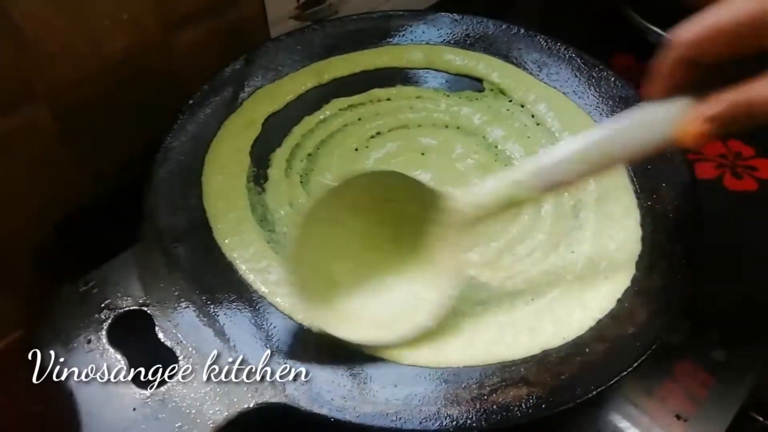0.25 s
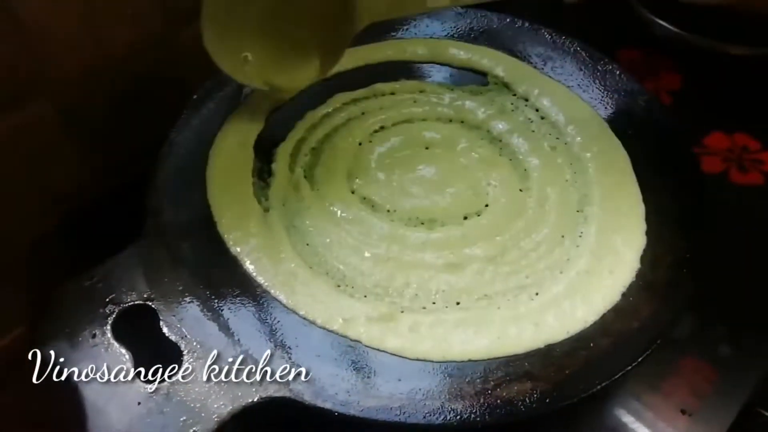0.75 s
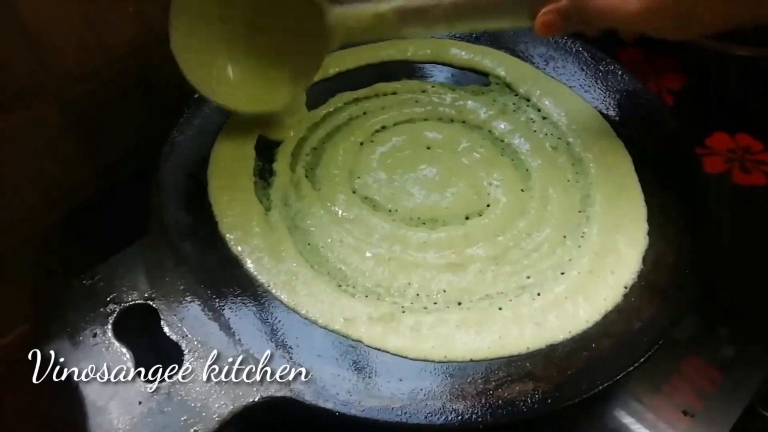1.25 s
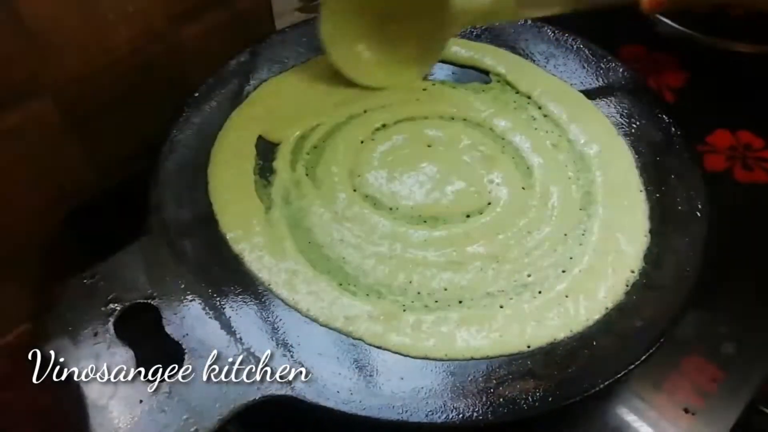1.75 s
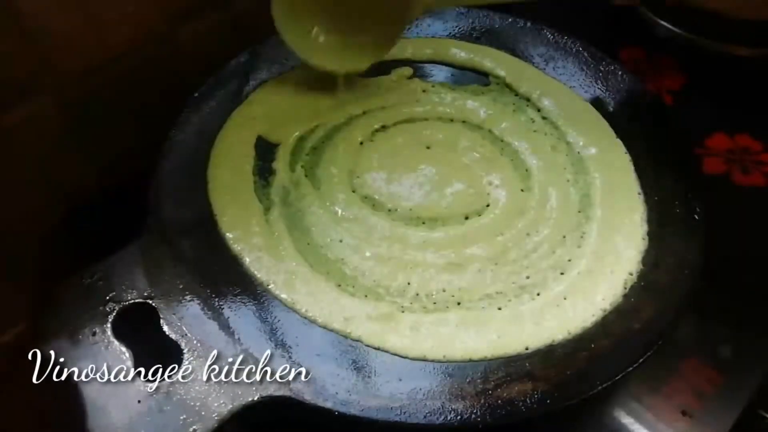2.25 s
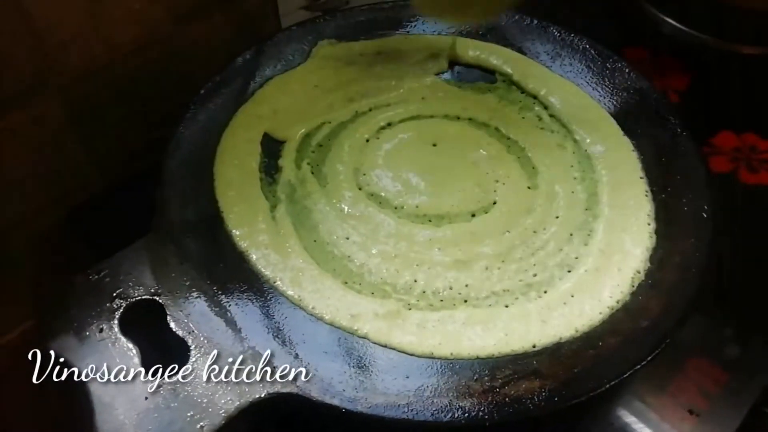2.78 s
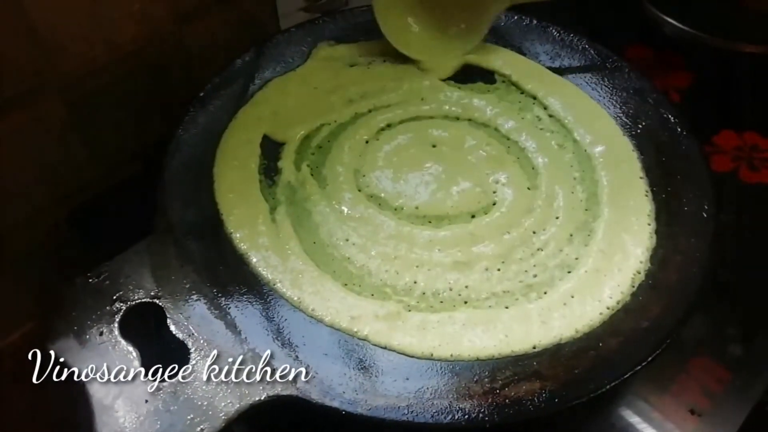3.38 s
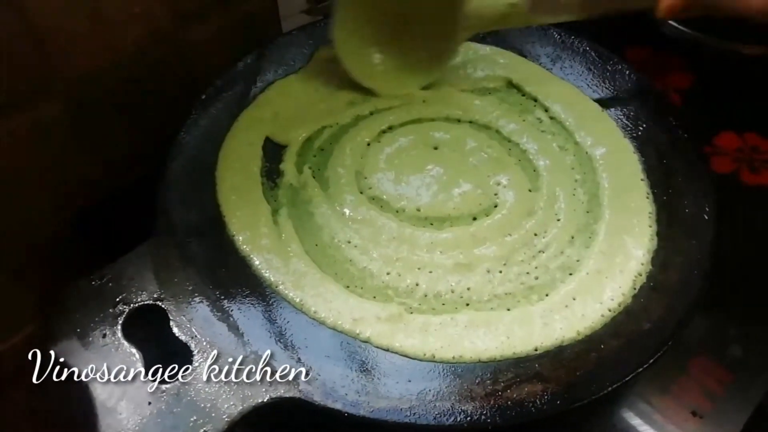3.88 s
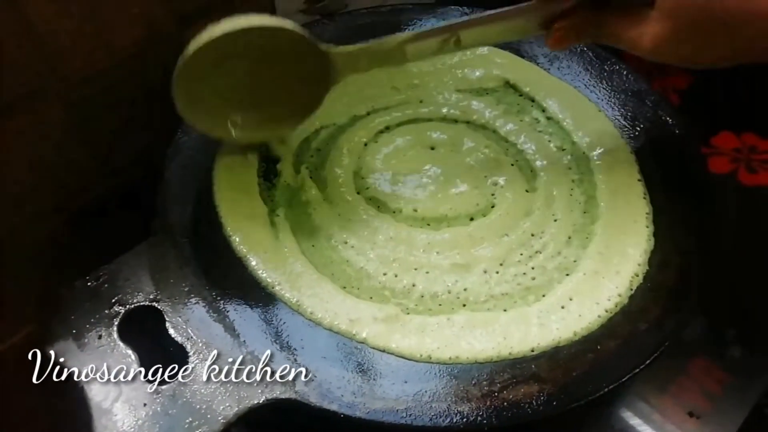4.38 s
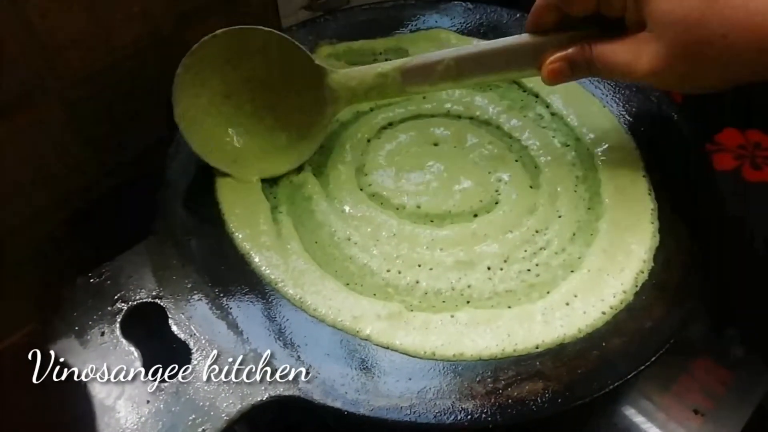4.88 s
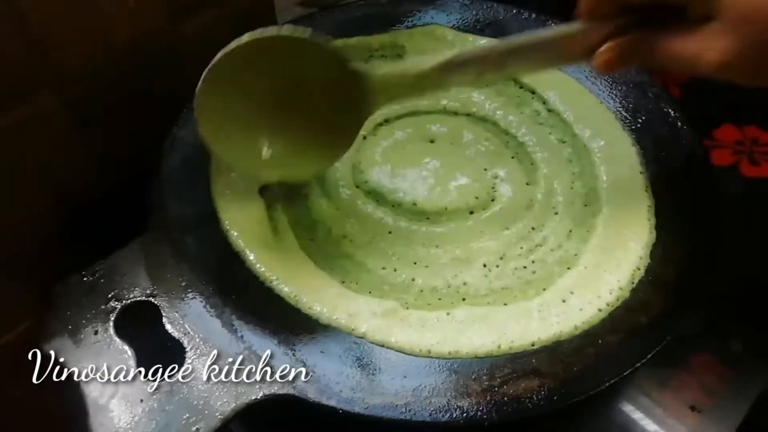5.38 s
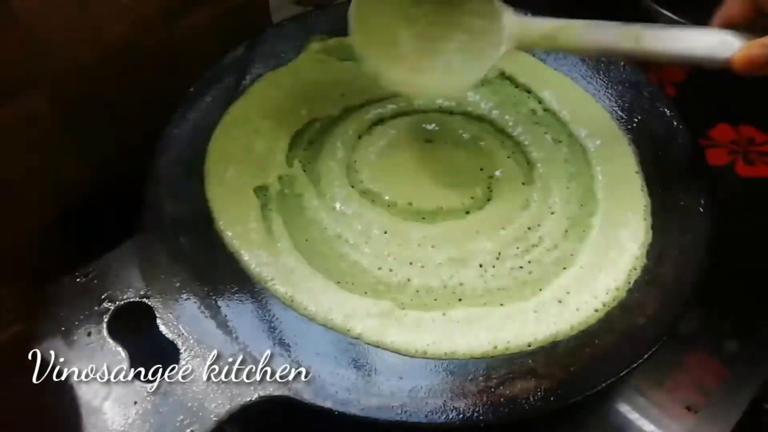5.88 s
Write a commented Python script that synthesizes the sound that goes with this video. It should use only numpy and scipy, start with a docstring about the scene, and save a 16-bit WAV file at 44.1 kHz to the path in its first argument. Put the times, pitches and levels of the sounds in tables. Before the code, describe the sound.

Wet batter sizzles and crackles sharply on a hot griddle, with bursts of pressed-out steam, the frying thinning to sparse pops over six seconds.

```python
"""Batter frying on a hot griddle

Batter fries on a hot iron griddle in a home kitchen, heard close by through two unlike microphone ports.
Clumped random clicks make the crackle of tiny steam bubbles; resonators ring as bubbles under the batter.
Larger bubbles pop as a snap with decaying noise; steam, pressed out by the ladle, is noise in narrow bands,
and gaps whistle faintly. Under it lie room noise, hum tones, a swelling rumble and two dull bumps."""
import sys
import numpy as np
from scipy import signal
from scipy.fft import rfft, irfft
from scipy.io import wavfile
from scipy.ndimage import map_coordinates

SR = 44100
rng = np.random.default_rng(int(sys.argv[2]) if len(sys.argv) > 2 else 0)


def int16_out(signal):
    """Quantize to a 16-bit WAV file."""
    q = np.round(np.clip(np.atleast_2d(signal).T, -1, 1) * 32767)
    wavfile.write(sys.argv[1], SR, q.astype(np.int16))


N = 270333


def amp(db):
    """Amplitude ratio of a level in dB, by the decibel law."""
    return 10 ** (np.asarray(db) / 20)


def rms_one(x):
    """Normalisation of mean power: the signal scaled to rms 1."""
    return x / np.sqrt(np.mean(x ** 2) + 1e-20)


def in_time(rows):
    """Linear interpolation of each column of a curve, sample by sample."""
    times_s, *columns = np.transpose(rows)
    return [np.interp(np.arange(N) / SR, times_s, column) for column in columns]


def drift(rate):
    """Band-limited fluctuation: a smooth curve through normal random knots, rate of them a second."""
    knots = rng.standard_normal(1000)
    return map_coordinates(knots, [np.arange(N) / SR * np.clip(rate, .1, 150)], order=3)


def filtered(x, order, edges_hz, kind):
    """Butterworth filtering: a maximally flat pass band."""
    return signal.sosfilt(signal.butter(order, edges_hz, kind, fs=SR, output="sos"), x)


def colour(x, points):
    """Minimum-phase filtering: folding the cepstrum gives the causal response of a spectrum (f/Hz, level/dB)."""
    hz, db = np.transpose(points)
    grid = np.fft.rfftfreq(4096, 1 / SR) + 1
    log_gain = np.interp(np.log(grid), np.log(hz), db) * np.log(10) / 20
    cepstrum = irfft(log_gain)
    cepstrum[1:2048] *= 2
    cepstrum[2049:] = 0
    response = irfft(np.exp(rfft(cepstrum)))
    return signal.oaconvolve(x, response)[:N]


def resonance(x, hz, width_hz):
    """Damped resonance: a pole pair whose radius sets the bandwidth, with about unit gain at its peak."""
    r = np.exp(-np.pi * width_hz / SR)
    zeros = np.array([1, 0, -1]) * (1 - r * r) / 2
    poles = [1, -2 * r * np.cos(2 * np.pi * hz / SR), r * r]
    return signal.lfilter(zeros, poles, x)


def bursts(per_s, spread_db, clump_db):
    """Clustered random process: clicks of fluctuating rate; most are small, a few larger when spread_db > 0."""
    crowding = .15 * drift(9) + .8 * drift(40) + .7 * drift(110)
    rate = per_s / SR * amp(clump_db * np.clip(crowding, -2, 1.6))
    born = rng.random(N) < rate
    size = amp(spread_db * np.minimum(rng.exponential(1, N), 4.0))
    return born * size * rng.choice([-1, 1], N) + 1e-18


def spots(clicks, lean_s, lag_s, echo_db, echo_t60, count=10):
    """Path difference: clicks are dealt to places, each with its own port delays and near echoes."""
    out, dealt = np.zeros((2, N)), rng.integers(0, count, N)
    t = np.arange(700) / SR
    for k in range(count):
        offset_s = lean_s + lag_s * rng.uniform(-1.15, 1)   # half the delay of left behind right
        echoes = amp(echo_db - 60 * t / echo_t60) * rng.standard_normal((2, len(t)))
        direct = np.sinc((t - .0004 - offset_s * np.array([[1], [-1]])) * SR)
        out += signal.oaconvolve((clicks * (dealt == k))[None], echoes + direct, axes=1)[:, :N]
    return out


def ports(x):
    """Frequency response of the two ports: each colours the griddle differently, after a bass cut."""
    # response of each port to sound from the griddle: f/Hz, level/dB
    left_response = [(300, -19), (600, -17), (1000, -9.5), (1800, -4.5), (2450, -7.5), (2800, -1.5),
                     (3700, 2), (4600, 9.5), (5100, 7.5), (6300, 13), (7700, -1.5), (9800, -14),
                     (10900, -7), (12500, -23.5), (14800, -4.5), (15600, -65)]
    right_response = [(300, -31), (600, -13.5), (1000, -9), (1900, -7.5), (2500, 3), (2950, 9.5),
                      (3400, 5.5), (4000, 4), (6000, 5.5), (7500, 3.5), (8200, 5.5), (9200, 0),
                      (10000, 3.5), (11000, -2), (14900, -0.5), (15600, 6.5)]
    x = filtered(x, 2, 550, "high")   # no bass comes from the batter
    return np.array([colour(x[0], left_response), colour(x[1], right_response)])


def crackle(level_db):
    """Superposition of impulses: countless tiny bursts merge into a hiss, with sharper single ticks above it."""
    fine = bursts(12000, spread_db=0.5, clump_db=3.0)
    fine = spots(fine, lean_s=.00003, lag_s=0.000041, echo_db=-21.0, echo_t60=0.033)
    ticks = bursts(1100, spread_db=4.5, clump_db=6.5)
    ticks = spots(ticks, lean_s=.00003, lag_s=0.00017, echo_db=-10.0, echo_t60=0.011)
    fine = signal.lfilter([1, -.15], [1], fine)   # the smallest bubbles are the brightest
    return amp(level_db) * rms_one(ports(rms_one(fine) + amp(-1.0) * rms_one(ticks)))


def bubbling(swing_db):
    """Bubble resonance: size sets the pitch of bubbles ringing under the wet batter; they fade with the frying."""
    # bubbles of one size crowd in: t/s, half length/s, f/Hz, added share (ratio)
    gurgles = [(3.274, 0.16, 1560, 4.4), (3.805, 0.13, 1060, 3.4), (4.63, 0.061, 1550, 1.2)]
    gurgle_spread = 0.18   # of log pitch
    prevailing_hz, mean_db, follows, waver_db = 1550, -47.5, 0.91, -0.5   # follows: share of the frying's swing
    t = np.arange(N) / SR
    clicks = bursts(1200, spread_db=1.5, clump_db=4.0)
    dealt, rings = rng.integers(0, 14, N), 0
    for k, hz in enumerate(np.geomspace(750, 2300, 14)):
        share = 1.86 + np.exp(-.5 * (np.log(hz / prevailing_hz) / 0.06) ** 2)
        for s, half, at_hz, more in gurgles:
            off_pitch = np.log(hz / at_hz) / gurgle_spread
            share = share + more * np.exp(-((t - s) / half) ** 2 - off_pitch ** 2)
        rings = rings + resonance(clicks * share * (dealt == k), hz, 0.035 * hz)
    level_db = mean_db + follows * swing_db + waver_db * drift(8.7)
    placed = spots(rings, lean_s=0, lag_s=.00003, echo_db=-75, echo_t60=0.07, count=1)
    return amp(level_db) * rms_one(ports(placed))


def steam():
    """Jet noise: puffs through many small gaps excite bands near a centre pitch and over an octave below it.

    The ports hear the puffs in unrelated phase."""
    # steam squeezed out from under the batter: t/s, level/dB (rms), centre f/Hz
    jets = [(0.0, -34, 6300), (0.5, -38, 6400), (0.54, -23, 5440), (0.585, -22.5, 5200),
            (0.615, -23.5, 5200), (0.65, -25, 5140), (0.68, -24.5, 5000), (0.76, -29, 5100),
            (0.9, -31, 5400), (1.0, -35, 5170), (1.3, -28, 5700), (1.42, -37.5, 6300), (2.0, -38, 5250),
            (2.18, -35.5, 5200), (2.44, -27.5, 5700), (2.61, -31.5, 5300), (2.77, -66, 5530),
            (2.83, -32, 6500), (2.95, -91, 5650), (3.08, -45, 5750), (3.24, -42, 5740), (3.38, -40, 4600),
            (3.43, -31.5, 5150), (3.68, -24.5, 5400), (3.89, -30.5, 5080), (3.96, -26.5, 5560),
            (4.26, -30, 5480), (4.35, -28.5, 4930), (4.44, -25.5, 5150), (4.58, -31.5, 5460),
            (4.72, -30.5, 5200), (4.79, -30, 5730), (4.99, -32, 5950), (5.12, -40.5, 5750),
            (5.36, -63, 5900), (6.13, -70, 5800)]
    strong_jet_db, under_at_strong_db, under_gain_per_db = -26.5, -14, 0.68
    level_db, centre_hz = in_time(jets)
    # the weaker the jet, the larger the share of its lower band
    under_db = np.minimum(under_at_strong_db + under_gain_per_db * (strong_jet_db - level_db), -4.0)
    puffs = bursts(9000, spread_db=0.0, clump_db=1.5) * rng.choice([-1, 1], (2, N))
    dealt, main, under = rng.integers(0, 14, N), 0, 0
    for k, hz in enumerate(np.geomspace(4450, 6700, 14)):
        nearness = np.exp(-.5 * (np.log(hz / centre_hz) / 0.094) ** 2)
        gap = puffs * (dealt == k) * (0.28 + nearness)
        gap = gap * amp(1.9 * drift(18))   # each gap opens and closes on its own
        main = main + resonance(resonance(gap, hz, 450), hz, 940)
        under = under + resonance(gap, 0.444 * hz, 480)
    right_stronger = amp([[0], [1.5]])
    return amp(level_db) * rms_one(ports((main + amp(under_db) * under) * right_stronger))


def kitchen():
    """Interchannel coherence: room noise is more alike at both ports in the bass; hum and rumble are identical."""
    # room noise spectrum, normalised below: f/Hz, relative level/dB
    room_spectrum = [(29, -32.5), (50, 0.5), (92, -1), (150, -6), (238, -7), (292, -10.5), (522, -17.5),
                     (582, -18.5), (900, -18.5), (1170, -38), (1980, -120)]
    # wavering hum tones: f/Hz, width of each of two resonances/Hz, level/dB (rms)
    hum_tones = [(61.2, 18, -66), (100.8, 5.8, -60.5), (198, 10, -65), (594, 7.8, -78), (650, 23, -76.5)]
    # swells added to the steady rumble: t/s, top level/dB (rms), half length/s
    rumble_swells = [(0.233, -52, 0.07), (0.66, -64, .1), (1.55, -67, .2), (2.286, -48.5, 0.23),
                     (3.486, -58, 0.25), (4.244, -46.5, 0.37), (4.902, -54, 0.09), (5.92, -61, 0.16)]
    room_db, rumble_db = -57.5, -62.5
    rise_s, rise_db = 5.66, 2   # the room noise grows a little toward the end
    t = np.arange(N) / SR
    mid, side = (rms_one(colour(rng.standard_normal(N), room_spectrum)) for _ in range(2))
    side = filtered(side, 2, 260, "high") * amp(-1.5)
    late_db = rise_db / (1 + np.exp((rise_s - t) / .15))
    room = amp(room_db + late_db) * (mid + side * [[1], [-1]])
    hum = amp(-61.5 + 2.0 * drift(3.86)) * np.sin(2 * np.pi * 243.0 * t)   # motor tone, steady in pitch
    for hz, width, db in hum_tones:
        tone = resonance(resonance(rng.standard_normal(N), hz, width), hz, width)
        hum = hum + amp(db) * rms_one(tone)
    deep = filtered(rng.standard_normal(N), 4, [19, 33], "band")
    swell = amp(rumble_db) + sum(amp(db) * np.exp(-((t - s) / half) ** 2) for s, db, half in rumble_swells)
    return room + hum + swell * rms_one(deep)


def pops(rows):
    """Impulsive rupture: a snap and a spatter of noise decay in three stages, in bands of each bubble's own mix."""
    # level of the long tail in the edge, ring, body and top bands: level/dB
    linger_db = (-12, -12, -10, -21)
    snap_height, snap_t60_s = 6.1, .004   # height against noise of rms 1
    spatter_db, spatter_t60_s, linger_t60_s = -11, 0.023, 0.25
    rise_time_s = 0.00079   # time constant of a short noise rise into each snap
    top_db = 0.5   # the highest treble against the edge
    lead, length = 40, 3000   # samples before the snap, and in all
    t, out = (np.arange(length) - lead) / SR, np.zeros((2, N + length))
    noise = rng.standard_normal((len(rows), 2, length))   # different at each port
    noise[:, :, lead] = snap_height * np.sign(noise[:, :1, lead])   # the skin tears in one snap
    bands_hz = [8450, 14700], [5020, 10560], [785, 3900], [12000, 18000]   # edge, ring, body, top
    age, rise = np.maximum(t, 0), np.exp(np.minimum(t, 0) / rise_time_s)
    early = amp(-60 * age / snap_t60_s) + amp(spatter_db - 60 * age / spatter_t60_s)
    fades = [rise * (early + amp(db - 60 * age / linger_t60_s)) for db in linger_db]
    for (s, edge_db, ring_db, body_db), hiss in zip(rows, noise):
        levels_db = edge_db, edge_db + ring_db, edge_db + body_db, edge_db + top_db
        window = out[:, round(s * SR):][:, :length]
        for band_hz, fade, level_db in zip(bands_hz, fades, levels_db):
            part = filtered(hiss * fade, 2, band_hz, "band")
            window += amp(level_db) * part / abs(part).max(axis=1)[:, None]
    return ports(out[:, lead:N + lead])


def small_pops(swing_db):
    """Uniform random arrivals: times and levels of lesser bubbles, stronger while the frying is lively."""
    # centres of the random levels: edge level/dB, ring against edge/dB, body against edge/dB
    centre_db = (-34, -11, -1)
    # spread of the same three levels: edge/dB, ring/dB, body/dB
    level_spread_db = (3, 5, 5)
    count, follows = 90, 0.96   # follows: share of the frying's swing
    s = rng.uniform(0, N / SR, count)
    levels = centre_db + np.minimum(rng.standard_normal((count, 3)), 1) * level_spread_db
    levels[:, 0] += follows * swing_db[(s * SR).astype(int)]
    return np.column_stack([s, levels])


def bumps():
    """Structure-borne knocks through the stand: each swing takes about twice as long as the last, left port first."""
    # knocks before filtering: t/s, drive level/dB, signed push (ratio), first swing/s, length/s
    knocks = [(0.0945, -9.5, -0.72, 0.0011, 0.0046), (6.076, -18.5, 0.23, 0.0024, 0.0038)]
    right_delay_s = .00094
    t, out = np.arange(N) / SR - np.array([[0], [right_delay_s]]), np.zeros((2, N))
    for s, drive_db, push, swing, length in knocks:
        age = np.maximum(t - s, 0)
        fade = np.exp(-(age / length) ** 2.04)
        out += push * amp(drive_db) * fade * np.sin(4.34 * np.log(1 + age / swing))
    out = filtered(out, 1, [30, 650], "band")
    out = filtered(out, 1, 1100, "low")
    return out * amp([[1.5], [-1.5]])


def whistles():
    """Narrow-band noise: breathy tones swell and go, unrelated at the two ports and stronger at the left."""
    # a gap in the batter whistles: t/s, half length/s, f/Hz, level/dB (rms before swell and port balance)
    gap_tones = [(0.585, .02, 5500, -31), (0.615, 0.033, 5360, -25), (0.645, 0.021, 5170, -31),
                 (0.76, 0.072, 5210, -37), (1.142, 0.033, 5770, -36), (2.274, 0.07, 4800, -39),
                 (3.425, 0.043, 5400, -38), (3.8, 0.035, 5400, -44), (3.97, 0.12, 5770, -31.5),
                 (4.175, .03, 5450, -33), (4.19, .03, 4800, -43), (4.266, 0.056, 5750, -28.5),
                 (4.56, 0.052, 4900, -36.5), (4.721, 0.13, 4830, -43), (4.797, 0.061, 5960, -39),
                 (4.87, 0.065, 4900, -41), (4.96, .08, 5940, -54), (5.005, 0.066, 4870, -40),
                 (4.86, 0.065, 2960, -53), (4.96, 0.055, 2960, -47), (5.03, 0.045, 3080, -54),
                 (4.44, 0.059, 5120, -34), (4.51, 0.036, 5200, -32), (3.76, 0.052, 5100, -31)]
    width_hz = 190   # of each of two resonances
    t, out = np.arange(-SR // 4, SR // 4) / SR, np.zeros((2, N + SR))
    for s, half, hz, db in gap_tones:
        tone = rng.standard_normal((2, len(t)))
        tone = resonance(resonance(tone, hz, width_hz), hz, width_hz)
        out[:, round(s * SR) - SR // 4:][:, :len(t)] += amp(db) * rms_one(tone) * np.exp(-(t / half) ** 2)
    return out[:, :N] * amp([[4.0], [-3.0]])


def scene():
    """Linear superposition of griddle, stand and kitchen."""
    # vigour of the frying, as the fine crackle: t/s, level/dB (rms)
    frying = [(0.0, -23), (0.3, -24.5), (0.56, -26.5), (1.37, -29), (2.1, -32.5), (2.4, -31), (2.94, -36),
              (4.28, -35), (4.9, -34.5), (5.2, -40), (5.67, -40), (6.13, -37.5)]
    # large bubbles before port colouring: t/s, edge peak level/dB, ring against edge/dB, body against edge/dB
    large_pops = [(0.0169, -23, -28, 3.5), (0.0371, -25, -1, 1.0), (0.095, -13.5, 7, -0.5),
                  (0.1114, -19.0, 9, -3), (0.1494, -17, -11.0, -18.0), (0.1634, -14.5, 1, 0.5),
                  (0.1734, -19, 8, -4), (0.2036, -24, 0.0, -13), (0.2322, -12.0, -7, -15),
                  (0.2586, -14, -8.0, -8), (0.3198, -8, -10.0, -22.0), (0.3364, -5.5, -10.0, -8.5),
                  (0.4026, -17.0, -4, -8), (0.4552, -16, -4.0, -4), (0.5237, -22, -18.0, -16),
                  (0.5301, -13.0, -20.0, -4), (0.5504, -2, -7.0, -9.5), (0.5554, -23, -15.0, -9.0),
                  (0.584, -26, -2, 3), (0.5938, -30, -5, -3.0), (0.617, -21, -2, -7.0),
                  (0.6234, -25, -12, -21), (0.6276, -21, 0, 1), (0.6703, -17, -11, -16),
                  (0.6811, -18.0, -13.0, -16.0), (0.6854, -19, 2, -2.0), (0.7176, -10, -9.0, -7.5),
                  (0.7769, -17, -17.0, -5), (0.7985, -9.5, -12, -10), (0.8243, -17, 5, -2),
                  (0.8342, -8, 3, -5), (0.899, -8, -10, -22.0), (1.0655, -27, -10.0, -22.0),
                  (1.0919, -12, -18.0, -6.0), (1.0955, -9, -4, -12), (1.0995, -17, -5, -13),
                  (1.1956, -16, -17.0, -17), (1.2189, -15.0, -15.0, -6), (1.2355, -13, -19.0, -17),
                  (1.2646, -7.5, -24, -6), (1.3477, -25, -2.0, -6), (1.3601, -13.5, 7, -15),
                  (1.3676, -16.0, -20.0, -24), (1.3816, -14, 4, -2.5), (1.4369, -16.0, -11.0, -22.0),
                  (1.4477, -18, -14, -22.0), (1.4568, -3.5, -2, -16), (1.4678, -18, 4, -5),
                  (1.5373, -15.5, 6.5, 1), (1.5421, -22, -6, -20.0), (1.5543, -13, -6.0, -7.5),
                  (1.6176, -16, -11, -4), (1.6369, -9.5, -3, -14), (1.6454, -8.5, -17, -12),
                  (1.7057, -15.5, -9, -5.5), (1.731, -11.5, -0.5, -14), (1.7409, -10, -18.0, -28.0),
                  (1.804, -19.0, 2, -20.0), (1.8307, -11, 2.5, -5), (1.8387, -19.0, -19.0, -19.0),
                  (1.8622, -12.5, -16, -7), (1.9924, -20, 5, -2.0), (2.0735, -23, -20.0, -19),
                  (2.0828, -27, -12, -19.0), (2.1395, -23, -12, -17), (2.169, -15, -8, -23.0),
                  (2.1864, -9.0, -5, -17), (2.2049, -19, -10.0, -21.0), (2.2307, -16, -4, -18.0),
                  (2.2415, -14, -17, -22.0), (2.3187, -15, -16.0, -22), (2.3236, -21, -16.0, -2),
                  (2.3468, -25, -15, -21.0), (2.3773, -19.0, 0, -21.0), (2.4092, -20.0, -15, -18.0),
                  (2.4195, -16, -2.0, -5), (2.4639, -19.0, -7.0, -9.0), (2.471, -11, 4, -7.5),
                  (2.5073, -15, -1, -17), (2.5309, -5.5, -2, -18.0), (2.5433, -18, -5, -7),
                  (2.565, -15, -4, -11), (2.6242, -14, -4, -6), (2.6734, -13.5, 1, -14.0),
                  (2.705, -17.0, -8, -23), (2.72, -17, -6.0, -9), (2.733, -20.0, -7, -7.0),
                  (2.7709, -10.5, -7, -12.5), (2.7934, -21, 4, -8), (2.808, -14, -16.0, -18),
                  (2.8316, -29, 16, 7.5), (2.8439, -17.5, 8.5, -1.5), (2.8651, -21, -13, -20.0),
                  (2.876, -20.0, -23.0, -29), (2.8934, -30, -2.0, -19.0), (2.9265, -57, -3.0, -9),
                  (2.9715, -15.0, 0, -1.5), (2.9761, -12, -13.0, -16), (2.9818, -10, -2, -12.5),
                  (2.9866, -27, -9.0, -1), (2.9978, -16, -1, -7), (3.0275, -19.0, -17, -17),
                  (3.0822, -21, 2, -8.0), (3.1249, -16, -9, -17.0), (3.1551, -19.0, -14, -16.0),
                  (3.1771, -13, -15, -21), (3.1982, -12, -21, -9.0), (3.2255, -7, -5.5, -16),
                  (3.2415, -26.0, 9.5, 4), (3.249, -21, -7.0, -18.0), (3.2546, -28, -10, -33),
                  (3.3896, -29, -6.0, 2), (3.4206, -11, -1, -11), (3.4256, -28, -2, -17.0),
                  (3.5839, -17, -13.0, -12), (3.5898, -23.0, -7, -18.0), (3.6355, -22, -9.0, -13.0),
                  (3.755, -25.0, -8.0, -2), (3.8644, -29, -11.0, -8.0), (3.8968, -19, -6, -22),
                  (3.9254, -26, -9, -19.0), (3.9416, -19.0, -9, -10.0), (3.9909, -24, -7.0, -19.0),
                  (4.0257, -14.0, -20, -23), (4.031, -17, -6, -15.0), (4.0344, -12.5, -1, -4.5),
                  (4.0572, -18, -12.0, -19.0), (4.0928, -10, 2, -13), (4.1268, -22, -7, -2),
                  (4.134, -14, -2, -25.0), (4.2043, -14.5, 7, -8), (4.2527, -21.0, -3, -4),
                  (4.2578, -15.5, -12, -19), (4.2786, -21.0, -12.0, -17), (4.3091, -24, -15.0, -22.0),
                  (4.338, -18, -3.0, -12), (4.3674, -20, -14.0, -3.5), (4.3883, -21, 2, -16.0),
                  (4.5046, -13, -12.0, -20), (4.6139, -19.5, 7, -5), (4.7497, -24.0, -9, -17.0),
                  (4.7777, -20, 4, -22), (4.797, -26.0, -10.0, -7), (4.8848, -33, -11.0, -17),
                  (4.9234, -21.0, -5, -8), (4.9505, -20, -13.0, -3), (4.9707, -20, -9.0, -16),
                  (4.9942, -28, -4, 3), (4.999, -23, -10.0, -17), (5.1098, -30, -8.0, -17.0),
                  (5.1536, -29, 8, -8), (5.1917, -22, 2, -5.0), (5.2169, -18.5, -4, -9),
                  (5.2211, -22, -3, -3.5), (5.2984, -29, 3, -12), (5.3114, -28, 11, 0),
                  (5.3173, -9.5, -5.5, -15), (5.3324, -19, -16.0, -8), (5.3362, -22, -22.0, -9),
                  (5.3463, -18, -7, -11.0), (5.3967, -18, 0, -12), (5.4241, -18, -5.0, -11.5),
                  (5.4485, -9.5, -5.5, -18), (5.4632, -22, -14.0, -21.0), (5.5534, -17.0, -17, -21),
                  (5.5597, -16, -15, -14.0), (5.5951, -11, -8, -16), (5.6049, -22, -11, -8.5),
                  (5.6131, -14, -9.0, -16.0), (5.664, -23, 2, -4.0), (5.6864, -9.5, 0, -8),
                  (5.7093, -28.0, -3, 5), (5.7132, -10.5, -6, -23), (5.8175, -23, -6, -2.0),
                  (5.8262, -36, -14.0, -20.0), (5.859, -17, -1.5, -10.5), (5.8676, -19, -25.0, -14),
                  (5.9017, -35, 1.0, 7.0), (5.9249, -14, -5.0, -11), (5.9611, -23, -12, -33),
                  (5.9854, -18, -3, -12), (6.0194, -21, -2.0, -5.5), (6.0808, -20.0, -8.0, -15),
                  (6.1133, -22.0, -7, -25.0), (6.1262, -16, -4, -8)]
    frying_db, = in_time(frying)
    swing_db = frying_db - frying_db.mean()
    batter = crackle(frying_db) + bubbling(swing_db) + steam()
    batter = batter + pops(large_pops) + pops(small_pops(swing_db)) + whistles()
    return batter + kitchen() + bumps()


def record(dry):
    """Saturation and band limiting: peaks are rounded, the last treble much weakened, then the top is cut."""
    dry = .9 * np.tanh(dry / .9)
    below = signal.sosfilt(signal.cheby1(10, .5, 15200, fs=SR, output="sos"), dry)
    below = below + amp(-27) * dry   # a weak remnant of the treble
    return signal.sosfilt(signal.cheby2(20, 60, 16700, fs=SR, output="sos"), below)   # 60 dB down at 16700 Hz


dry = scene()
out = record(dry)
int16_out(out)
```